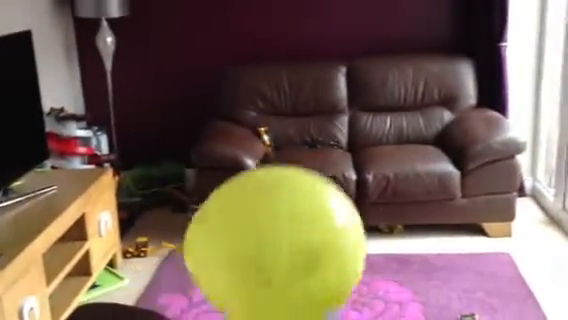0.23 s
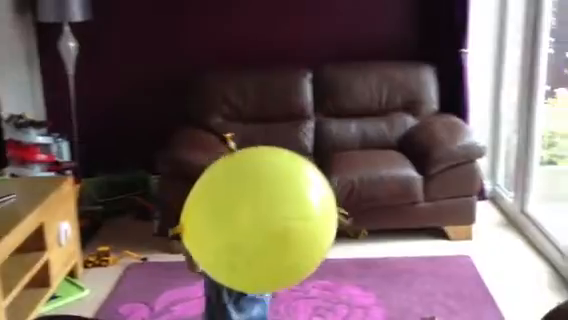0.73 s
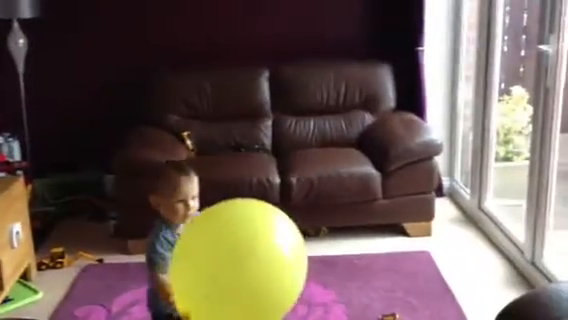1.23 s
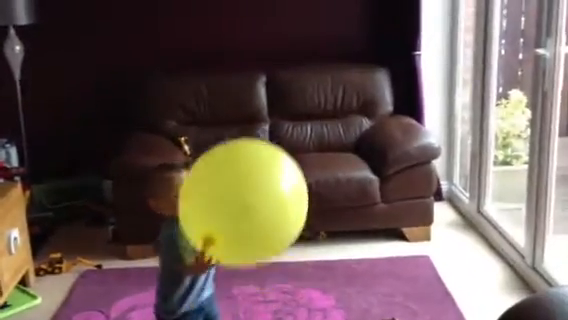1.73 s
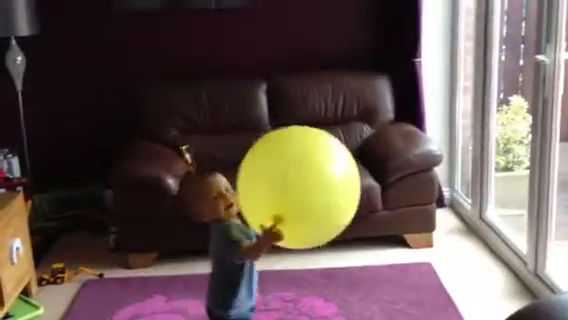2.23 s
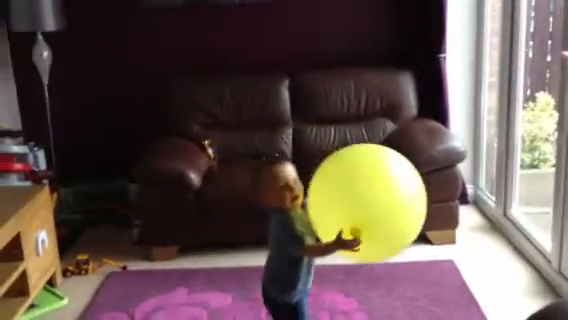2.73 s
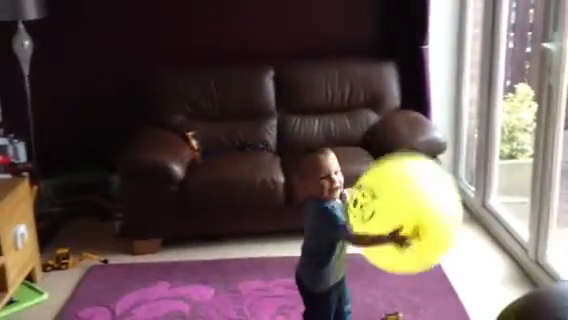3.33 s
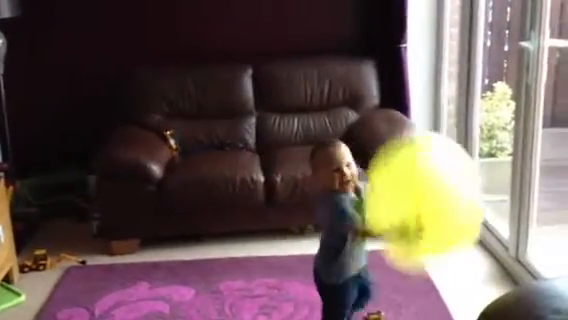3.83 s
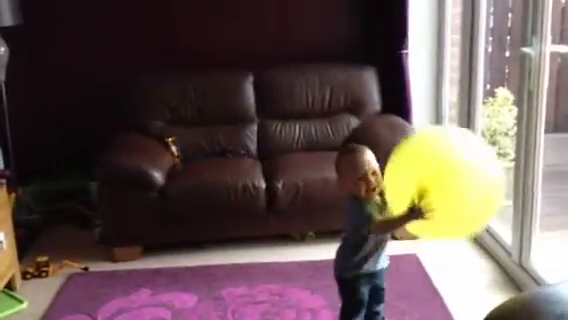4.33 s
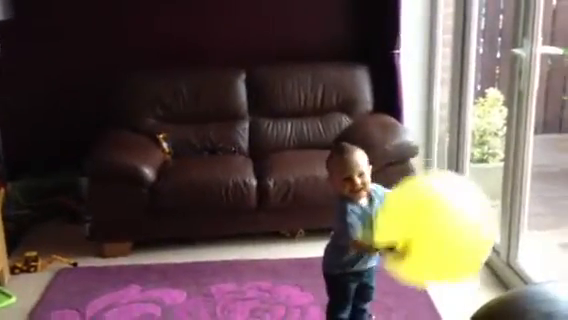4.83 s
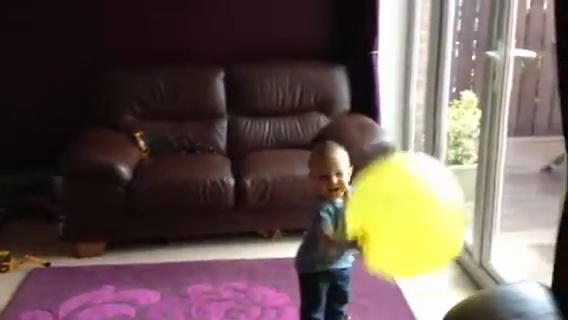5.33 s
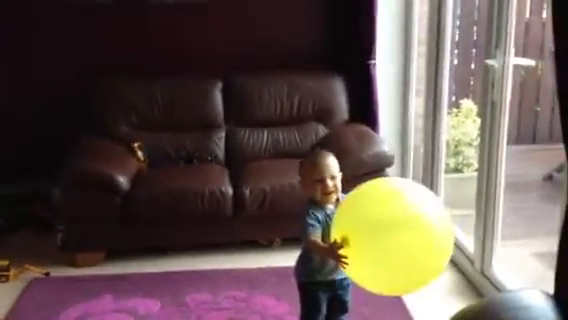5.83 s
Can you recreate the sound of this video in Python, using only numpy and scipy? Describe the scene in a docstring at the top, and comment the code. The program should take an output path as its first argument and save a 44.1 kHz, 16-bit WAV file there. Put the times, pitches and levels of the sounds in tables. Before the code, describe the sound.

A light, dry scrape comes and goes right at the microphone, like a finger or sleeve brushing it, with soft hollow bumps and one tiny tick. About halfway through, it turns into loud, scratchy back-and-forth strokes, around seven a second. Near the end a few brief squeaks slip out, then the rubbing eases. Behind it is only the faint air of a quiet living room.

```python
"""A light, halting, dry scrape right at the ear, which grows into hard strokes, about seven a second.
Something, perhaps a finger or sleeve, rubs a camera's microphone during play with a balloon in a quiet
living room; the scrape is countless tiny slips. Nudges thud in the camera's case, the surface catches
once with a tick, and late on the slips lock into brief squeaks."""
import sys
import numpy as np
from scipy import signal
from scipy.fft import rfft, irfft
from scipy.io import wavfile

SR = 44100
rng = np.random.default_rng(int(sys.argv[2]) if len(sys.argv) > 2 else 0)


def unload_wav(signal):
    """Save mono or channel-first audio to the path in sys.argv[1] as 16-bit WAV at rate SR, clipped to [-1, 1]."""
    wavfile.write(
        sys.argv[1],
        SR,
        np.round(np.clip(np.atleast_2d(signal).T, -1, 1) * 32767).astype(np.int16),
    )


N = 267731
T = np.arange(N) / SR
HZ = np.fft.rfftfreq(N, 1 / SR)


def gain_of(db):
    """Decibels to amplitude."""
    return 10 ** (np.asarray(db) / 20)


def unit_rms(x):
    """Scales to rms 1."""
    return x / np.sqrt(np.mean(x ** 2) + 1e-20)


def curve_db(points):
    """An EQ curve in dB: points joined by straight lines on a log-frequency axis."""
    hz, db = np.transpose(points)
    return np.interp(np.log(HZ + 1), np.log(hz + 1), db)


def coloured(x, gain):
    """Filters x by a gain for each frequency."""
    return irfft(rfft(x) * gain, N)


def wobble(rate_hz):
    """A smooth random waver of rms 1, up to about the given rate."""
    return unit_rms(coloured(rng.standard_normal(N), 1 / (1 + (HZ / rate_hz) ** 4)))


def slips(per_s, spread_db):
    """The grain of friction: tiny clicks of uneven size at random moments."""
    size = gain_of(spread_db * np.minimum(rng.exponential(1, N), 4.5))
    return unit_rms(size * rng.choice([-1, 1], N) * (rng.random(N) < per_s / SR))


def room_tone(level_db=-54.5):
    """Faint steady air of the room."""
    # The colour of the air. Each row: frequency in Hz, spectral level in dB.
    air_colour = [(20, -14), (60, -35), (110, -11.5), (170, -1), (400, -10.5), (1500, 0.5), (6000, -3.5),
                  (15000, -23)]
    return gain_of(level_db) * unit_rms(coloured(rng.standard_normal(N), gain_of(curve_db(air_colour))))


def surface_catch(start_s=2.5285, level_db=-43.5, spray_decay_s=0.022, tick_decay_s=0.00039):
    """The surface catches and lets go: a small tick with a spray of bright slips behind it."""
    age = np.maximum(T - start_s, 0)
    envelope = (T >= start_s) * (np.exp(-age / spray_decay_s) + 2 * np.exp(-age / tick_decay_s))
    bright_band = HZ / (HZ + 1500) / (1 + (HZ / 12000) ** 2)
    spray = unit_rms(coloured(slips(per_s=10000, spread_db=-3), bright_band))
    return gain_of(level_db) * envelope * spray


def case_ring(x, modes):
    """The case rings at a few resonances, at about the power of x, with the deep bass falling away."""
    body = sum(gain_of(db) / (1 + 1j * (HZ ** 2 - hz ** 2) / (width * HZ + 1e-9))
               for hz, width, db in modes)
    body = body * HZ ** 2 / (HZ ** 2 + 95 ** 2)
    return coloured(x, body / np.sqrt(np.mean(abs(body) ** 2)))


def nudges(rise_s=0.0035, fall_s=0.06):
    """Each nudge is a short, rough drag that rings the case; where it lands picks the resonances."""
    # Nudges on the case. Each row: start in seconds, thud level in dB, then deep boom and
    # hollow knock, both in dB against the thud.
    hits = [(.594, -58, -1, -1), (.804, -53.5, -9, -3), (.885, -53, -12, 4), (.913, -46.5, -8, -13),
            (1.034, -49, 5, -11), (1.103, -50, -7, 3.5), (1.167, -52, -4, -4), (1.26, -56.5, 3, -3),
            (1.34, -50.5, -2, -3), (1.747, -51, 2, -17), (1.787, -49, -4, -9), (1.891, -53, -3, -5),
            (2.125, -46.5, -5.5, 3.5), (2.45, -57, 3, -2), (2.521, -52, -8, 3), (2.667, -54.5, -8, 4),
            (2.701, -44.5, -18, -2), (2.89, -48, -10, 6.5), (3.122, -51, -1, 8), (3.158, -48.5, -3, 13.5),
            (3.293, -44.5, -12, -1), (3.38, -48, -5, 14), (3.981, -40, -15, -10), (4.084, -49, 1, -10),
            (4.347, -37, -8, 2), (4.614, -42, -11, -9), (4.88, -39.5, -17, -4), (5.525, -40, -13, 3)]
    # The case's boom, thud and knock resonances. Each row: frequency in Hz, width in Hz, level in dB.
    boom_modes = [(100.5, 11, -5.5), (155.5, 13, -2), (188, 28, 1)]
    thud_modes = [(243, 13, 8), (273.5, 34, 9), (364, 49, 4)]
    knock_modes = [(616, 36, -12), (744, 50, 4), (900, 57, -4), (1200, 360, -5)]
    boom, thud, knock = np.zeros((3, N))
    for start, thud_db, boom_db, knock_db in hits:
        age = np.maximum(T - start, 0)
        push = gain_of(thud_db) * (1 - np.exp(-age / rise_s)) * np.exp(-(age / fall_s) ** 0.97)
        thud += push ** 2
        boom += (push * gain_of(boom_db)) ** 2
        knock += (push * gain_of(knock_db)) ** 2
    layers = [(boom, boom_modes), (thud, thud_modes), (knock, knock_modes)]
    return sum(case_ring(np.sqrt(power) * slips(per_s=3500, spread_db=1.5), modes)
               for power, modes in layers)


def squeaks():
    """Sticking and slipping turn regular for a moment: a wavering, sagging tone."""
    # The squeaks. Each row: start and length in seconds, first and last pitch in Hz, level in dB.
    glides = [(5.098, 0.05, 508, 475, -34), (5.214, 0.056, 900, 860, -30.5), (5.262, 0.083, 855, 803, -39)]
    out = np.zeros(N)
    waver = 1 + 0.022 * wobble(rate_hz=120)
    tremble_db = 2.0 * wobble(rate_hz=90)
    for start, length, start_hz, end_hz, db in glides:
        progress = np.clip((T - start) / length, 0, 1)
        hz = (start_hz + (end_hz - start_hz) * progress ** 2) * waver
        swell = np.sqrt(4 * progress * (1 - progress)) * gain_of(db + tremble_db)
        out += swell * unit_rms(np.sin(2 * np.pi * np.cumsum(hz) / SR))
    return out


def smeared(grain, decay_s=0.0008, spots=10):
    """Each slip is smeared over a millisecond or so, differently from one spot to the next."""
    spot = rng.integers(spots, size=N)
    spectra = rfft(rng.standard_normal((spots, 512)) * np.exp(-np.arange(512) / SR / decay_s))
    tails = np.roll(irfft(spectra / abs(spectra)), 128, axis=1)  # phase only, so no added colour
    return unit_rms(sum(signal.oaconvolve(grain * (spot == k), tail)[:N] for k, tail in enumerate(tails)))


def shifting_patch(grain, depth_db=1.45, span_hz=90, span_s=0.06):
    """The contact patch moves, so its small resonances come and go."""
    hz, t, spectra = signal.stft(grain, SR, nperseg=1024, noverlap=768)
    per_hz = np.fft.fftfreq(len(hz), hz[1])[:, None]
    per_s = np.fft.fftfreq(len(t), t[1])
    blur = np.exp(-2 * ((per_hz * span_hz) ** 2 + (per_s * span_s) ** 2))
    ripple = unit_rms(np.fft.ifft2(np.fft.fft2(rng.standard_normal(spectra.shape)) * blur).real)
    _, rippled = signal.istft(spectra * gain_of(depth_db * ripple), SR, nperseg=1024, noverlap=768)
    return unit_rms(rippled[:N])


def rubbing_motion(speed_treble_db=5.5, speed_bass_db=-3.5, dulling_db=-4):
    """Strokes ride on a slow drag: gives the level, and the treble and low mids against it, in dB."""
    # The drag under the strokes. Each row: time in seconds, level in dB.
    drag = [(0, -43), (.85, -44.5), (1.3, -46), (1.68, -57.5), (2.1, -55), (2.5, -53.5), (2.8, -51),
            (3.22, -41), (3.3, -49.5), (3.55, -27.5), (5.6, -28.5), (5.85, -40.5), (6.07, -35.5)]
    # The strokes, light and then hard. Each row: start and length in seconds, level in dB,
    # crispness (treble) in dB, pressure (low mids) in dB.
    strokes = [(-.2, 0.49, -43.5, -2.6, 4.5), (0.895, .095, -41, 4.8, -3), (1.015, .113, -38.4, 3.5, 2),
               (1.036, 0.28, -45.5, -8, -1), (1.237, 0.2, -47, 1, -2), (1.48, 0.18, -50.5, -2, -3),
               (1.737, 0.15, -47, 3, 11.5), (1.873, 0.075, -49.5, 8, 10.5), (1.926, 0.16, -37.5, 0.5, 0),
               (2.03, 0.27, -41.5, 0, -3), (2.216, .119, -42, 0, -4), (2.247, 0.3, -44, -2, 3),
               (2.525, 0.14, -45.5, 4, 0), (2.56, 0.26, -41.5, -2, -1), (2.811, 0.19, -43.5, -7, 4),
               (2.893, .06, -42, -11, 6), (2.987, .181, -46.5, 0, 4), (3.147, 0.075, -36, -6, -3),
               (3.339, .115, -30, 1, 5), (3.437, 0.14, -20.5, -0.5, 3), (3.553, 0.13, -21.5, -.6, 0.5),
               (3.668, 0.17, -22.5, 0, 3.5), (3.792, 0.2, -23.5, 0, 3.5), (3.946, 0.2, -21.5, 1.5, 0.5),
               (4.089, 0.18, -23, -0.5, -1), (4.24, 0.19, -22.5, 0.5, -0.5), (4.39, 0.2, -25, -1, 0.5),
               (4.55, 0.2, -22.5, 1, -4), (4.692, .17, -25, -1, 2), (4.849, 0.19, -21, -.9, -8),
               (4.982, 0.18, -22.8, 0, -0.5), (5.125, 0.21, -21, -2, -3.5), (5.278, 0.19, -26, -1, -0.5),
               (5.435, 0.34, -28.6, -5, -9), (5.894, 0.48, -34.5, -5, -1)]
    drag_power = gain_of(np.interp(T, *np.transpose(drag))) ** 2
    whole, treble, bass = np.tile(drag_power, (3, 1))
    for start, length, db, crisp_db, pressure_db in strokes:
        during = (T > start) & (T < start + length)
        progress = (T[during] - start) / length
        speed = abs(np.sin(np.pi * progress ** 0.8)) ** 1.31  # one arch, peaking a little early
        power = (gain_of(db) * speed) ** 2
        # Brighter and thinner at full speed; the edge dulls towards the end of the stroke.
        edge_db = crisp_db + speed_treble_db * (speed - 0.9) + dulling_db * (progress - 0.5)
        whole[during] += power
        treble[during] += power * gain_of(edge_db) ** 2
        bass[during] += power * gain_of(pressure_db + speed_bass_db * speed) ** 2
    return 10 * np.log10([whole, treble / whole, bass / whole])


def scrape(firm_above_db=-41, firm_range_db=12):
    """Slips heard through the microphone's port: pressure fills the low mids, crispness adds treble."""
    # The colours of a light and a hard touch. Each row: frequency in Hz, spectral level in dB.
    light_colour = [(29, -82), (50, -61), (91, -41), (169, -37), (231, -11.5), (315, -12.5), (347, -8),
                    (462, -12.5), (601, -5.5), (661, -6), (782, -4), (860, -6), (2580, -6), (7580, -9.5),
                    (15200, -16)]
    hard_colour = [(29, -77), (50, -51.5), (242, -14.5), (451, -13), (485, -12.5), (661, -5.5), (820, -5.5),
                   (902, -3), (970, -5), (1350, -2), (2580, -0.5), (4810, -2.5), (7220, -8.5), (12200, -23),
                   (15200, -31)]
    # Peaks and dips of the port. Each row: frequency in Hz, width in Hz, gain in dB.
    port_bands = [(457, 19, -8.5), (790, 47, 0), (875, 85, -3.5), (1200, 86, 0), (1880, 140, 1),
                  (2600, 73, 1), (5080, 1100, 2), (5390, 1280, -4), (8550, 360, 1.5), (10300, 1450, -2)]
    port_db = sum(db * np.exp(-(2 * (HZ - hz) / width) ** 2) for hz, width, db in port_bands)
    level_db, crisp_db, pressure_db = rubbing_motion()
    low_shelf = 1 / (1 + (HZ / 1050) ** 6)
    top_shelf = 1 / (1 + (8800 / (HZ + 1)) ** 6)

    def contact(colour, grain, low_db, top_db):
        """One kind of touch, its low mids and treble following the strokes."""
        grain = shifting_patch(smeared(grain))
        eq_db = curve_db(colour) + port_db + low_db * low_shelf + top_db * top_shelf
        rub = unit_rms(coloured(grain, gain_of(eq_db)))
        weight = coloured(rub, low_shelf) * (gain_of(pressure_db) - 1)
        edge = coloured(rub, top_shelf) * (gain_of(crisp_db) - 1)
        return rub + weight + edge

    light = contact(light_colour, slips(per_s=14000, spread_db=-0.5), low_db=-3.0, top_db=-15.5)
    hard = contact(hard_colour, slips(per_s=9000, spread_db=1.0), low_db=2.3, top_db=1.3)
    firmness = np.clip((level_db - firm_above_db) / firm_range_db, 0, 1)  # louder is harder
    return gain_of(level_db) * (np.sqrt(1 - firmness) * light + np.sqrt(firmness) * hard)


def scene():
    """One microphone feeds both channels."""
    sound = scrape() + nudges() + squeaks() + surface_catch() + room_tone()
    return np.array([sound, sound])


def record(dry, bass_cut_hz=65, top_cut_hz=15350):
    """A gentle bass cut and a steep cut of the highest treble."""
    thinned = signal.sosfilt(signal.butter(2, bass_cut_hz, "highpass", fs=SR, output="sos"), dry)
    lowpass = signal.firwin(1023, top_cut_hz, window=("kaiser", 9), fs=SR)
    return signal.oaconvolve(thinned, lowpass[None], "same")


dry = scene()
out = record(dry)
unload_wav(out)
```